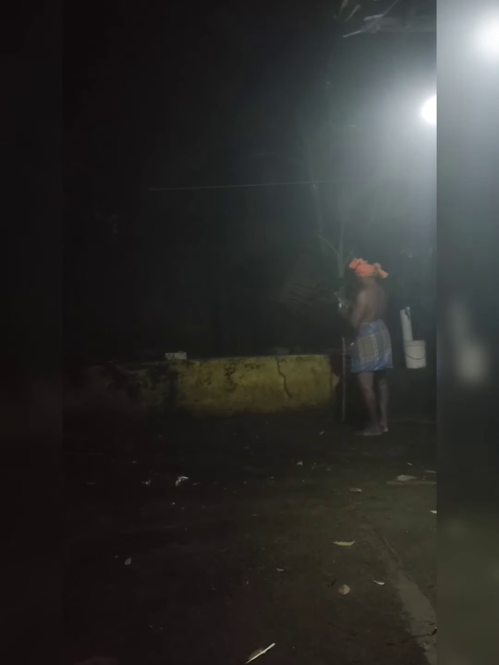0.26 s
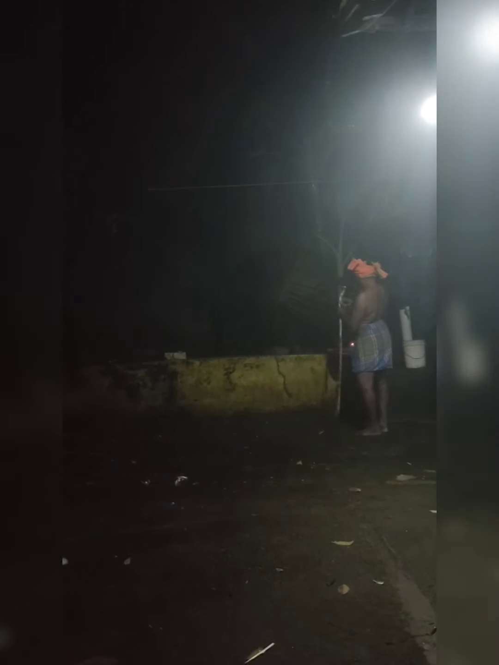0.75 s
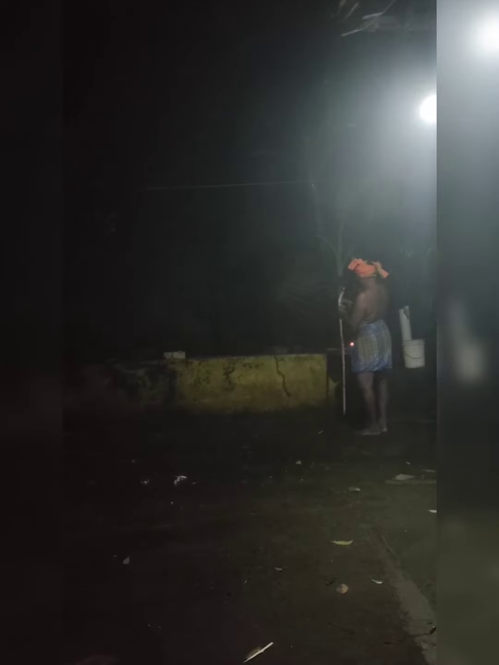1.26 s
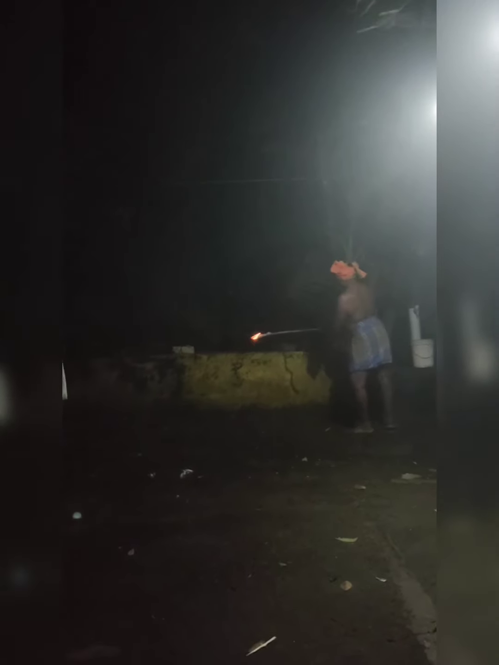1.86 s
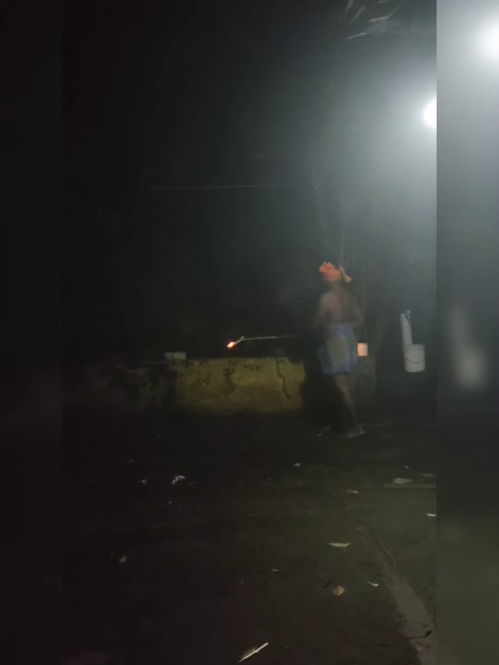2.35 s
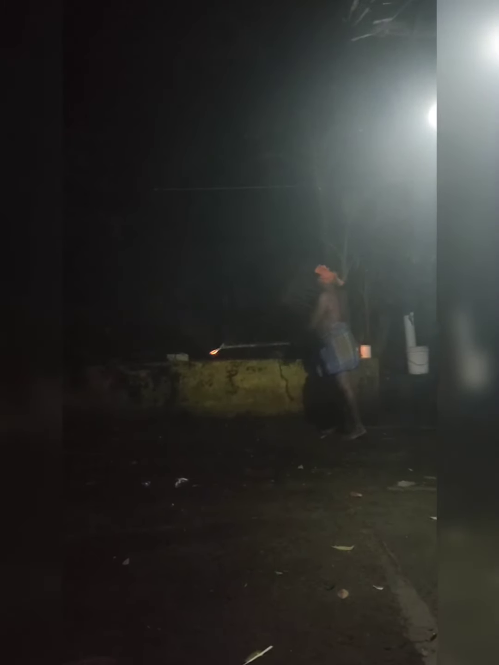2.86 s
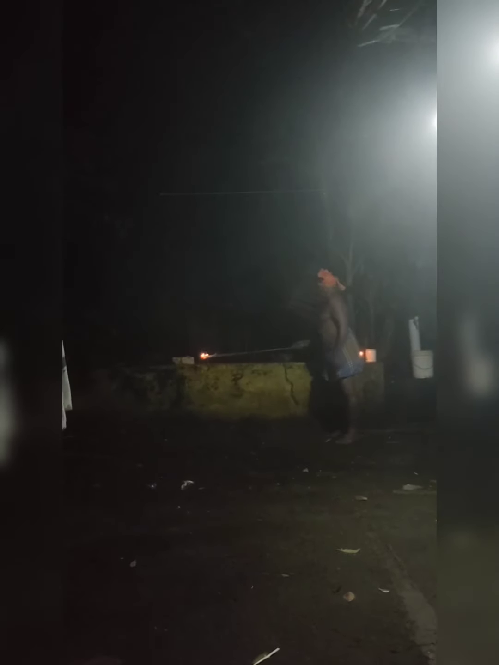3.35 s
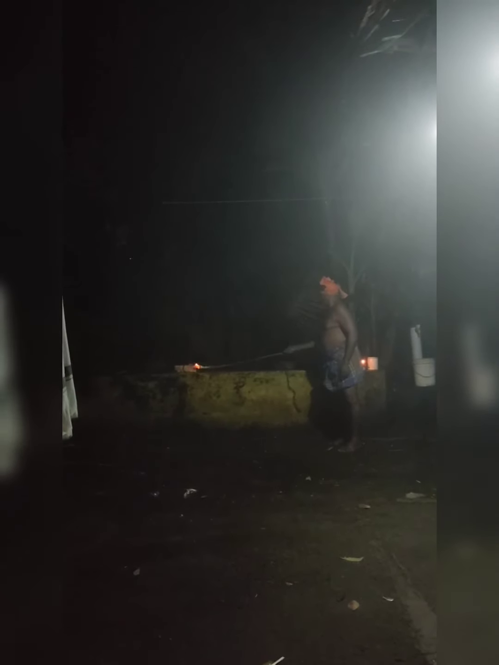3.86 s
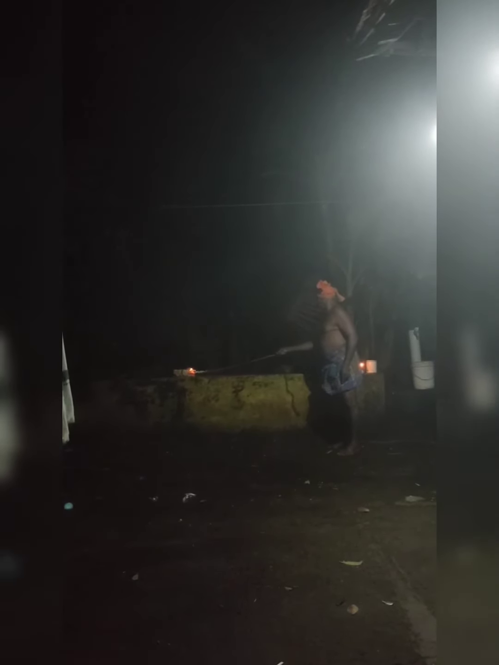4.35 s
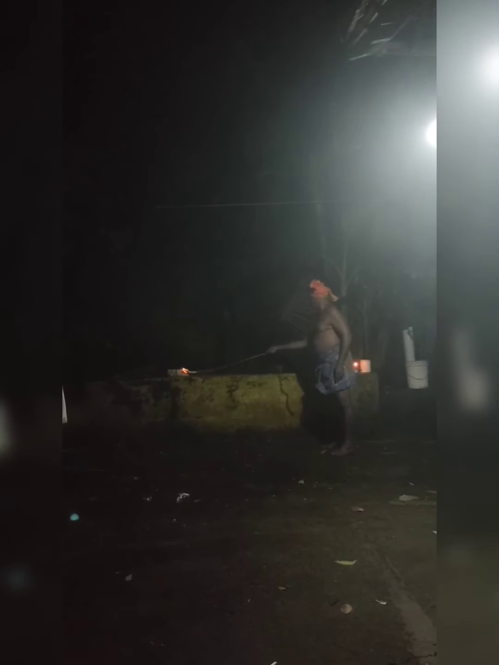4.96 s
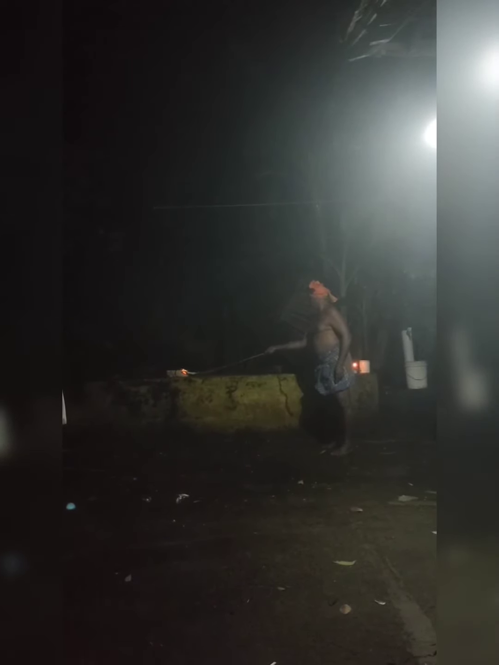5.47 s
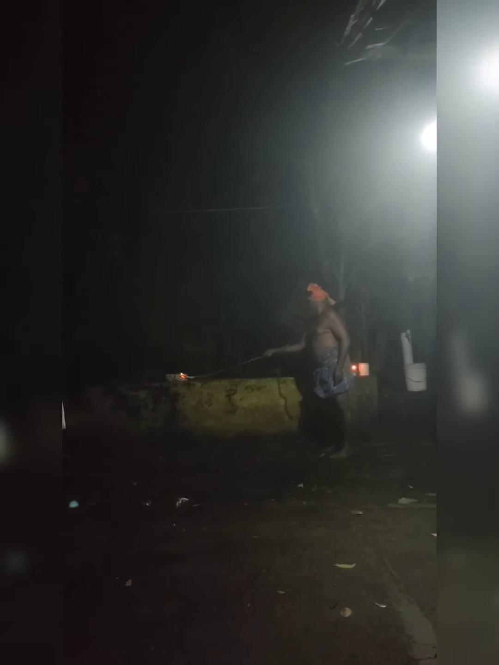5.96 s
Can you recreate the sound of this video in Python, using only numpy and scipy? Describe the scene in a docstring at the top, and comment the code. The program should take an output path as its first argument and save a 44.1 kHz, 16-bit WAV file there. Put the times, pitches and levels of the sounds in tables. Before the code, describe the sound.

Quiet outdoor night with thin insects, small wooden taps and rustles, then a sudden heavy firecracker boom with a rolling echo tail.

```python
"""Distant firecracker at night

A dull blast, then echoes rolling back from houses and trees, treble arriving late and dying first: low damped
cycles, then banded noise. Farther crackers thud before and after. Insects are narrow resonances of noise and
gliding tones; light knocks are ringing modes, scuffs and close cloth or leaves are shaped noise, over night air.
"""
import sys
import numpy as np
from scipy import signal
from scipy.fft import rfft, irfft
from scipy.io import wavfile

SR = 44100
rng = np.random.default_rng(int(sys.argv[2]) if len(sys.argv) > 2 else 0)


def materialize(psi):
    """Save the field psi as 16-bit PCM at rate SR to the path in sys.argv[1].

    A 1-D psi becomes a single channel; in a 2-D psi each row is a channel.
    """
    bounded = np.clip(np.atleast_2d(psi).T, -1, 1)
    quanta = np.round(bounded * 32767).astype(np.int16)
    wavfile.write(sys.argv[1], SR, quanta)


N = 273861


def amp(db):
    """dB to gain."""
    return 10 ** (np.asarray(db) / 20)


def rms_one(x):
    """Scale to rms 1."""
    return x / np.sqrt(np.mean(x ** 2) + 1e-20)


def seconds():
    """Time of every sample [s]."""
    return np.arange(N) / SR


def level_over_time(points):
    """Interpolate (time, level) points at every sample."""
    time_s, level_db = np.transpose(points)
    return np.interp(seconds(), time_s, level_db)


def at_hz(points, hz):
    """Read a spectrum on a log-frequency axis."""
    point_hz, value = np.transpose(points)
    return np.interp(np.log(hz), np.log(point_hz), value)


def drift(rate_hz):
    """Slow random wander of rms 1: noise through a two-pole lowpass at SR / 40, interpolated."""
    r = np.exp(-80 * np.pi * rate_hz / SR)
    noise = rng.standard_normal(N // 40 + 2002)
    slow = signal.lfilter([1], [1, -2 * r, r * r], noise)[2000:]     # settled part
    return np.interp(np.arange(N) / 40, np.arange(len(slow)), rms_one(slow))


def unbroken(start_s):
    """Gate, 1 or 0: a sound begun before the break stops short there."""
    break_s = 1.742
    return (seconds() < break_s) | (start_s > break_s)


def pan(x, left_minus_right_db):
    """Level difference between the ports; mono becomes stereo."""
    return x * amp([[left_minus_right_db / 2], [-left_minus_right_db / 2]])


def late_left(x):
    """The left port hears it a little later."""
    lag_samples = 7
    return np.array([np.roll(x[0], lag_samples), x[1]])


def noise_bands():
    """Yield (centre Hz, stereo noise of unit power per Hz), less alike left and right as pitch rises."""
    # left-right likeness: (frequency [Hz], correlation [0-1])
    likeness = [(60, 0.96), (250, 0.98), (500, 0.74), (1000, 0.45), (2000, 0.0)]
    edges_hz = 24 * 2 ** np.arange(0, 9.7, 1 / 2.5)
    white = rng.standard_normal((2, 2, N))     # two mid-side pairs, used by turns
    for k, (low_hz, high_hz) in enumerate(zip(edges_hz, edges_hz[1:])):
        band_filter = signal.butter(3, [low_hz, high_hz], "band", fs=SR, output="sos")
        mid, side = signal.sosfilt(band_filter, white[k % 2])
        centre_hz = np.sqrt(low_hz * high_hz)
        alike = np.clip(at_hz(likeness, centre_hz), 0, 1)
        stereo = np.sqrt(1 + alike) * mid + np.sqrt(1 - alike) * side * [[1], [-1]]
        yield centre_hz, stereo * np.sqrt(SR) / 2


def resonate(x, hz, width_hz):
    """One resonance, applied twice for steep skirts, scaled to rms 1."""
    r = np.exp(-np.pi * width_hz / SR)
    a = [1, -2 * r * np.cos(2 * np.pi * hz / SR), r * r]
    once = signal.lfilter([1, 0, -1], a, x)
    return rms_one(signal.lfilter([1, 0, -1], a, once))


def blasts():
    """Distance and the ground smear each shock into a few low cycles that swell and die."""
    # fronts, direct or off one wall: (time [s], envelope peak [dB], ring [Hz], third of time to peak [ms])
    fronts = [(1.072, -46, 194, 1.4), (1.094, -49, 197, 2.4), (1.944, -40, 277, 0.54),
              (1.96, -39.5, 403, 2.8), (2.689, -50, 182, 1.4), (3.0787, 1.0, 200, 1.55),
              (3.102, -4.5, 209, 1.5), (3.114, -1.5, 227, 0.71), (3.158, -4, 216, 1.25),
              (3.172, -3.5, 185, 1.44), (3.214, -4, 250.7, 3.9), (3.232, -7, 235, 1.64),
              (3.122, -0.5, 172, 0.78), (3.34, -19, 231, 2.5), (3.8, -26, 228, 2.0),
              (3.858, -24.5, 200, 1.7), (4.175, -33, 223, 2.4), (4.745, -32, 170, 1.7),
              (4.785, -34.5, 174, 2.9), (5.468, -36.5, 322, 0.8), (5.499, -32.5, 330, 0.77),
              (5.506, -36.5, 277, 1.5)]
    crack_db, crack_hz, crack_peak_s = -28.5, 917, 0.004     # faint brighter edge, dB re front
    out, t = np.zeros(N), np.arange(SR // 10) / SR
    v = t / crack_peak_s
    crack = (v * np.exp(1 - v)) ** 2 * np.sin(2 * np.pi * crack_hz * t)
    for start_s, db, ring_hz, third_ms in fronts:
        u = t / (third_ms / 1000 * 3)
        thud = (u * np.exp(1 - u)) ** 2.2 * np.sin(2 * np.pi * ring_hz * t)
        out[round(start_s * SR):][:len(t)] += amp(db) * thud + amp(db + crack_db) * crack
    return late_left(pan(out, -0.6))


def rolls(bands):
    """Countless echoes merge into noise; each pitch swells, holds and falls at its own pace."""
    # one per roll, from a cracker or a later echo:
    # (time [s], level [dB], tilt under 1 kHz [dB/octave], loss in the air [dB/kHz],
    #  swell stretch [x], fall stretch [x], low-middle lift [dB])
    echoes = [(1.068, -70, 2.5, 7.5, 5, 1.7, 5), (1.59, -70.5, 0, 14, 2.2, 0.6, -9),
              (1.942, -65.5, 3.5, 19.5, 0.3, 0.95, 4.5), (2.08, -70.5, -9, 14, 0.19, 0.22, 8),
              (2.688, -74.5, -5.5, 14, 0.47, 0.45, 5), (3.079, -32.5, 0, 0.07, 0.99, 1.06, -1),
              (3.339, -40.5, 3.0, 3.5, 0.15, 0.23, 0), (4.135, -60.5, -0.5, 8, 0.39, 0.8, -14),
              (4.745, -66, -6.0, 11, 0.91, 0.7, -1), (4.98, -69.5, 0.5, 8, 0.4, 1.2, -4),
              (5.491, -67, 5.5, 6, 1.3, 1.25, 4.0), (6.09, -74.5, -7, 8.0, 0.6, 0.6, 6.1)]
    # treble comes late, scattered by leaves, and dies first, before the stretches:
    # (frequency [Hz], rise [s], hold [s], fall [dB/s])
    pace = [(80, .012, .06, 41), (129, 0.0073, 0.086, 40.5), (230, 0.011, 0.045, 31),
            (450, 0.0031, 0.039, 35.5), (1200, 0.011, 0.11, 33.5), (1870, 0.017, 0.15, 45.5),
            (3000, .035, 0.22, 43.5), (6000, 0.056, 0.19, 55)]
    # echo spectrum before each roll's level, tilt and loss: (frequency [Hz], level [dB per Hz])
    colour = [(15, -65), (25, -30), (54, -26), (133, -4), (184, -7.5), (253, -5), (293, -2.5), (375, -14.5),
              (404, -5.5), (480, -11.5), (630, -19), (1110, -20), (1500, -25.5), (1900, -32), (8160, -58),
              (9000, -79), (11700, -95), (19800, -120)]
    late_db, late_fall_share = -14.5, 0.5     # echoes from farther off: weaker, slower to fall
    lift_hz, lift_octaves = 553, 0.48         # where some far echoes gather
    coarse_s = seconds()[::32]
    pace_hz, *pace_columns = np.transpose(pace)
    out, lumps = 0, drift(31)     # single walls stand out as lumps in the bass
    for hz, band in bands:
        rise_s, hold_s, fall_db_s = [np.interp(np.log(hz), np.log(pace_hz), c) for c in pace_columns]
        lift = np.exp(-(np.log2(hz / lift_hz) / lift_octaves) ** 2)
        octaves = np.log2(np.clip(hz, 120, 1000) / 250)
        power = 0
        for start_s, db, tilt_db, air_db, swell, slow, lift_db in echoes:
            since_s = np.maximum(coarse_s - start_s, 0)
            drop_db = fall_db_s / slow * np.maximum(since_s - hold_s * swell, 0)
            attack = (1 - np.exp(-since_s / (rise_s * swell))) ** 2
            decay = np.hypot(amp(-drop_db), amp(late_db - late_fall_share * drop_db))
            gain = amp(db + tilt_db * octaves - air_db * hz / 1000 + lift_db * lift)
            power = power + (gain * attack * decay * unbroken(start_s)[::32]) ** 2
        colour_db = at_hz(colour, hz) + 1.2 * np.clip(np.log2(1200 / hz), 0, 1) * lumps
        out = out + np.interp(seconds(), coarse_s, np.sqrt(power)) * amp(colour_db) * band
    return late_left(pan(out, -0.18))


def rustle():
    """Cloth or leaves close by: clumped fine grains, and dry snaps a few milliseconds long."""
    # rustles: (time [s], level [dB], rise [s], fall [dB/s], extra around 5.5 kHz [dB])
    rustles = [(0.104, -49, 0.0058, 210, 0.5), (1.1, -53.5, .2, 35, -7), (1.48, -54, .04, 53.5, -6),
               (1.62, -58, .02, 60, -27), (4.125, -62, .018, 202, 0), (5.028, -66, .004, 77, -3)]
    # relative spectrum of grains and snaps: (frequency [Hz], level [dB])
    grain_colour = [(1200, -6), (2300, 5.5), (4000, 6.5), (6500, 11), (9000, 6.5), (12000, -2), (15500, 5)]
    # snaps before colouring: (time [s], level [dB])
    snaps = [(0.101, -29), (1.7447, -52), (4.1344, -49), (5.0305, -48)]
    level, extra = 1e-9, 0
    for start_s, db, rise_s, fall_db_s, extra_db in rustles:
        since_s = seconds() - start_s
        fall = amp(db - fall_db_s * np.maximum(since_s - rise_s, 0))
        one = fall * np.clip(since_s / rise_s, 0, 1) * unbroken(start_s)
        level, extra = level + one, extra + one * (amp(extra_db) - 1)
    clumped = rng.standard_normal((2, N)) * amp(1.7 * rng.exponential(1, (2, N)))
    grains = level * amp(1.4 * drift(60)) * rms_one(clumped)
    t = np.arange(SR // 50) / SR
    for start_s, db in snaps:
        snap = amp(db) * (t / 0.00095) * np.exp(-t / 0.00098) * rng.choice([-1, 1], (2, len(t)))
        grains[:, round(start_s * SR):][:, :len(t)] += snap
    hz = np.maximum(np.fft.rfftfreq(N, 1 / SR), 1)
    tint = amp(at_hz(grain_colour, hz)) * np.minimum(hz / grain_colour[0][0], 1) ** 2
    crisp = np.exp(-np.log(hz / 5500) ** 2 / 0.36)     # stiffer stuff rings in the lower treble
    spectrum = rfft(grains) * rms_one(tint)
    return pan(irfft(spectrum, N) + extra / level * irfft(spectrum * crisp, N), 2.7)


def knocks():
    """Light taps on something hollow and wooden: each click rings a set of damped modes."""
    # taps: (time [s], level [dB])
    taps = [(1.290, -45), (2.1577, -40.5), (2.2632, -38), (2.332, -45), (2.3965, -43.5), (2.464, -53.5),
            (2.516, -50), (3.030, -54), (4.857, -49), (5.034, -49), (5.28, -51)]
    # modes: (frequency [Hz], level re tap [dB], decay by 60 dB [s])
    modes = [(456, 2, 0.016), (1030, -6, 0.012), (1197, -1.5, 0.018), (1630, -10.5, 0.017),
             (2400, -12, 0.009), (3300, -21, .006)]
    out = np.zeros(N)
    tap_s, tap_db = np.transpose(taps)
    at = [round(s * SR) for s in tap_s]
    spread_db = rng.normal(0, 1.0, (len(at), len(modes)))
    for k, (hz, mode_db, t60_s) in enumerate(modes):
        clicks = np.full(N, 1e-18)
        clicks[at] = amp(tap_db + mode_db + spread_db[:, k])
        r, w = amp(-60 / (t60_s * SR)), 2 * np.pi * hz / SR
        out += signal.lfilter([0, np.sin(w)], [1, -2 * r * np.cos(w), r * r], clicks)
    # the taps carry no bass
    thin = signal.sosfilt(signal.butter(2, 250, "high", fs=SR, output="sos"), out)
    return late_left(pan(thin, 1.0))


def scuff():
    """Something soft drags briefly over the ground: resonant noise, unevenly loud."""
    # scuffs: (time [s], time to fade start [s], level [dB], frequency [Hz], width of each resonator pass [Hz])
    drags = [(0.345, .11, -62, 760, 300), (0.388, 0.053, -62.5, 1030, 200), (0.828, 0.023, -60, 520, 200),
             (2.963, 0.12, -68, 1270, 299), (5.02, 0.056, -65.5, 1500, 1197),
             (5.258, 0.085, -66, 1310, 500)]
    rise_s, fade_s = 0.0068, 0.04
    out, uneven = 0, amp(2.0 * drift(28.6))
    for start_s, length_s, db, hz, width_hz in drags:
        shape = np.interp(seconds() - start_s, [0, rise_s, length_s, length_s + fade_s], [0, 1, 1, 0])
        out = out + amp(db) * shape * resonate(rng.standard_normal((2, N)), hz, width_hz)
    return out * uneven


def strokes():
    """Close insect: pitch glides down as the wing closes and up, weaker, as it opens; leaves blur it."""
    # chirps: (start [s], end [s], first stroke [dB], full stroke [dB], full-strength top [Hz], leaf blur [dB])
    chirps = [(1.184, 1.288, -58.5, -50.5, 5200, 0.5), (1.411, 1.51, -70, -46.5, 5250, -1.5),
              (1.657, 1.738, -65.5, -50.5, 5150, 1), (6.063, 6.207, -73, -56, 4910, 3)]
    low_hz, closing_s, beat_s = 4070, 0.019, 0.0345
    shortfall_kept = 0.392     # share of the dB shortfall left after each stroke
    opening_db, sag_hz_per_db = -6.5, 20     # weak strokes start lower
    out, tail_s = 0, np.arange(SR // 4) / SR
    scatter = np.exp(-tail_s / 0.014) * amp(-29) + np.exp(-tail_s / 0.063) * amp(-33)
    leaves = rng.standard_normal((2, len(tail_s))) * scatter
    teeth = amp(2.5 * drift(250))     # teeth catch unevenly
    for start_s, end_s, first_db, full_db, top_hz, blur_db in chirps:
        stroke, t = np.divmod(np.arange(round((end_s - start_s) * SR)) / SR, beat_s)
        short_db = (first_db - full_db) * shortfall_kept ** stroke
        closing = t < closing_s
        u = np.where(closing, t / closing_s, (t - closing_s) / (beat_s - closing_s))
        start_hz = top_hz + sag_hz_per_db * short_db
        hz = low_hz + (start_hz - low_hz) * np.where(closing, 1 - u, u)
        shape = amp(full_db + short_db + opening_db * ~closing) * np.abs(np.sin(np.pi * u)) ** 0.5
        tone = shape * np.sin(2 * np.pi * np.cumsum(hz) / SR) * signal.windows.tukey(len(t), 0.06)
        chirp = np.zeros(N + SR)
        chirp[round(start_s * SR):][:len(t)] = tone
        chirp = chirp[:N] * teeth
        blurred = signal.fftconvolve(chirp[None], leaves, axes=1)[:, :N]
        out = out + (chirp + amp(blur_db) * blurred) * unbroken(start_s)
    return pan(out, -10.5)


def thin_insects():
    """Thin songs swell and fade: slow noise carried on a moving pitch, with a fainter fuzz just under it."""
    # songs: (time [s], length [s], level [dB], first pitch [Hz], last pitch [Hz])
    songs = [(-0.12, 0.5, -57.5, 7760, 7860), (0.375, 0.26, -66, 7600, 7700),
             (0.617, 0.63, -57, 7930, 7830), (1.116, .42, -66.5, 7660, 7380), (1.51, .3, -65, 7600, 7770),
             (1.678, .32, -57.5, 7930, 8150), (1.974, 0.44, -63, 7800, 7900), (2.52, 0.43, -67, 7450, 7500),
             (2.852, 0.46, -59.5, 7950, 7950), (3.78, .3, -73, 7400, 6900), (4.394, .42, -69, 8150, 8440),
             (5.33, 0.37, -69.5, 7650, 7500), (5.503, 0.52, -58.5, 8100, 7840),
             (6.06, 0.27, -67.5, 7450, 7450)]
    blur_cutoff_hz, arch_power = 110, 0.77
    skirt_down_hz, skirt_db = 260, -10.5
    lowpass = signal.butter(2, blur_cutoff_hz, fs=SR, output="sos")
    blur = rms_one(signal.sosfilt(lowpass, rng.standard_normal((2, 2, N))))
    wander = np.exp(1j * np.cumsum(drift(40)) * 600 / SR)     # 600 rad/s rms
    skirt = 1 + amp(skirt_db) * np.exp(-2j * np.pi * skirt_down_hz * seconds()) * wander
    out = 0
    for start_s, length_s, db, first_hz, last_hz in songs:
        u = np.clip((seconds() - start_s) / length_s, 0, 1)
        phase = 2 * np.pi * np.cumsum(first_hz + (last_hz - first_hz) * u) / SR
        carrier = np.exp(1j * phase) * skirt
        arch = np.abs(np.sin(np.pi * u)) ** arch_power
        out = out + amp(db) * arch * (blur[0] * carrier.real + blur[1] * carrier.imag)
    return pan(amp(0.76 * drift(35)) * out, -2.5)


def crickets():
    """Many wings scraping at once: noise in narrow resonances, throbbing in and out of step."""
    # shared level: (time [s], level [dB])
    chorus_db = [(0.0, -67), (0.15, -65), (0.23, -78), (0.54, -72), (0.58, -67), (1.9, -67), (2.6, -69),
                 (2.85, -68), (3.9, -72), (4.1, -77.5), (4.22, -65.5), (4.5, -69.5), (5.1, -67),
                 (5.5, -69.5), (5.68, -66), (5.85, -69), (6.2, -67.5)]
    # resonances: (frequency [Hz], width of each resonator pass [Hz], level re chorus [dB])
    voices = [(3095, 98, 0.12), (2897, 310, 0.24)]
    level_db = level_over_time(chorus_db) + 1.0 * drift(9.2)
    out = 0
    for hz, width_hz, db in voices:
        voice = resonate(rng.standard_normal((2, N)), hz, width_hz)
        out = out + amp(level_db + db + 2.0 * drift(30)) * voice
    return pan(out, -0.6)


def steady_insect():
    """A faint steady insect to the right: one band of resonant noise."""
    hz, width_hz, db = 6380, 270, -77
    song = resonate(rng.standard_normal((2, N)), hz, width_hz)
    return pan(amp(db + 1.5 * drift(8)) * song, -8)


def insect_haze():
    """Hazy insect band: two resonances of noise under one level curve."""
    # level of each resonance: (time [s], level [dB])
    haze_db = [(0.0, -77), (1.95, -76.5), (2.5, -70), (3.05, -68.5), (3.45, -70), (3.95, -92), (4.4, -78),
               (4.65, -72.5), (5.2, -72), (6.0, -77.5), (6.2, -69)]
    # resonances: (frequency [Hz], width of each resonator pass [Hz])
    haze_bands = [(4300, 860), (4950, 970)]
    haze = sum(resonate(rng.standard_normal((2, N)), hz, width_hz) for hz, width_hz in haze_bands)
    return pan(amp(level_over_time(haze_db)) * haze, -4.5)


def night(bands):
    """Far village hum and open-air hiss: noise bands wandering partly together, partly alone."""
    # relative spectrum: (frequency [Hz], level [dB per Hz])
    air_colour = [(15, -51), (25, -30.5), (53, -21.5), (119, 1.5), (198, 1), (567, -9), (1340, -13),
                  (1620, -15), (3000, -13.5), (3340, -12), (5580, -22.5), (7700, -15.5), (10100, -20.5),
                  (14300, -22), (15500, -23)]
    night_rms_db = -58
    together = drift(8.2)
    air = 0
    for hz, band in bands:
        level_db = at_hz(air_colour, hz) + 0.67 * together + 0.62 * drift(16)
        air = air + amp(level_db) * band[:, ::-1]     # reversed in time, unlike the rolls
    return amp(night_rms_db) * late_left(rms_one(air))


def scene():
    """All sources at the two ports."""
    bands = list(noise_bands())
    events = blasts() + rolls(bands) + rustle() + knocks() + scuff()
    insects = strokes() + thin_insects() + crickets() + steady_insect() + insect_haze()
    return events + insects + night(bands)


def record(dry):
    """The small microphone drops the deepest bass, the loudest peak is rounded, the top is cut."""
    low_cut_hz, top_cut_hz, ceiling = 61, 15550, 1.3
    wet = signal.sosfilt(signal.butter(2, low_cut_hz, "high", fs=SR, output="sos"), dry)
    rounded = ceiling * np.tanh(wet / ceiling)
    return signal.sosfilt(signal.ellip(12, 0.5, 75, top_cut_hz, fs=SR, output="sos"), rounded)


dry = scene()
out = record(dry)
materialize(out)
```